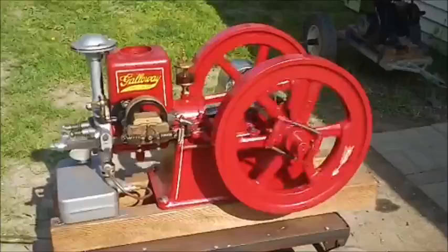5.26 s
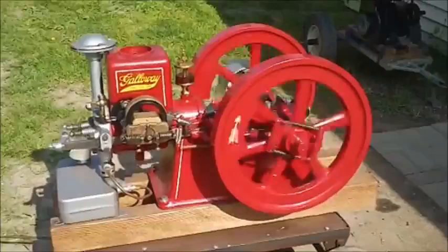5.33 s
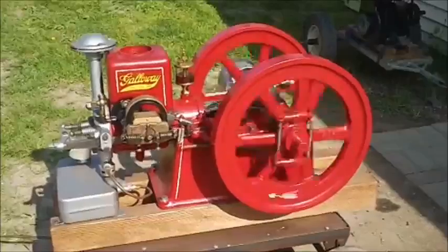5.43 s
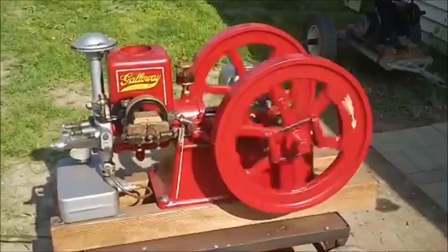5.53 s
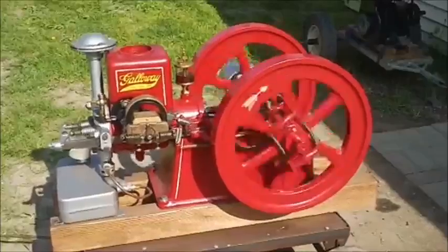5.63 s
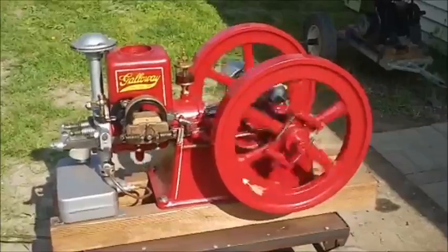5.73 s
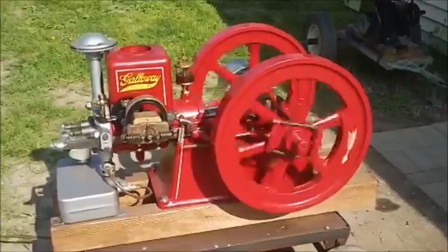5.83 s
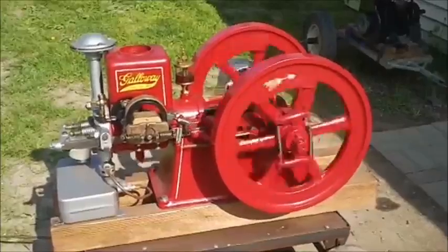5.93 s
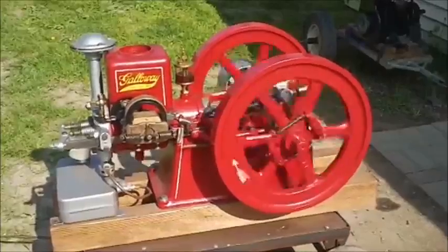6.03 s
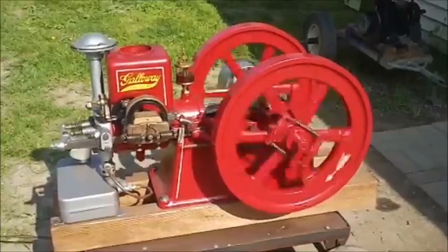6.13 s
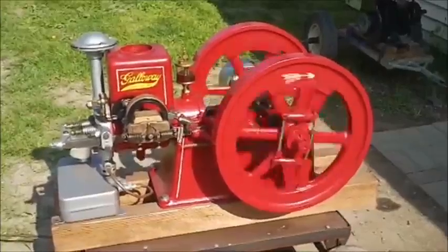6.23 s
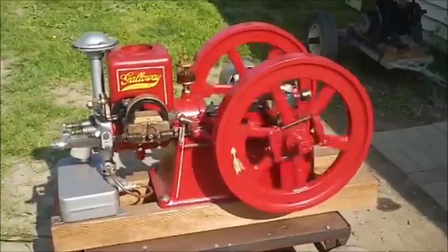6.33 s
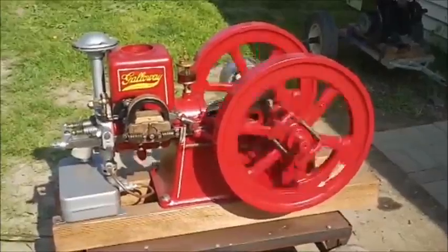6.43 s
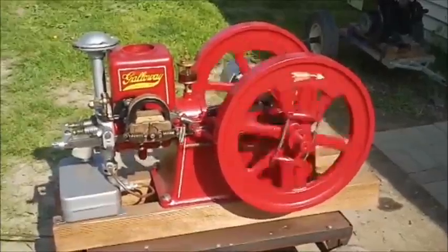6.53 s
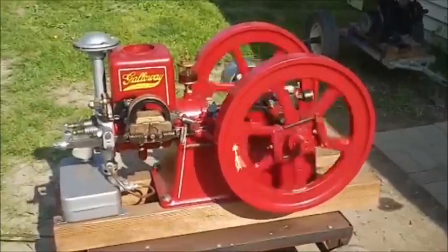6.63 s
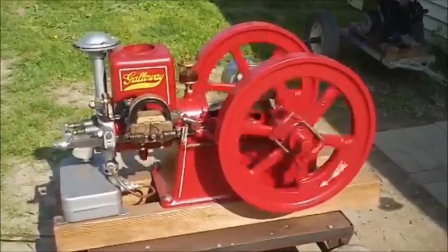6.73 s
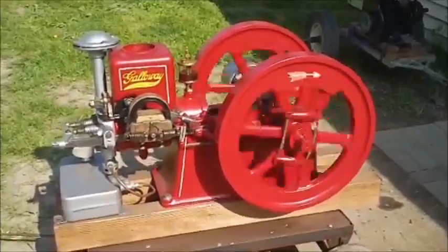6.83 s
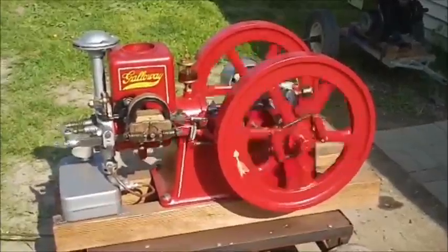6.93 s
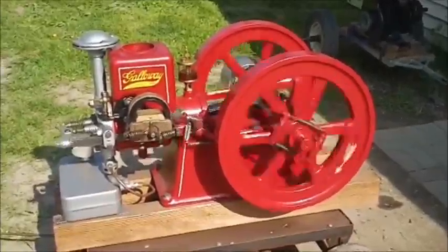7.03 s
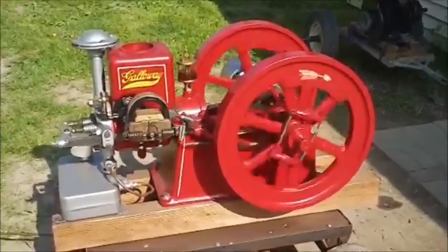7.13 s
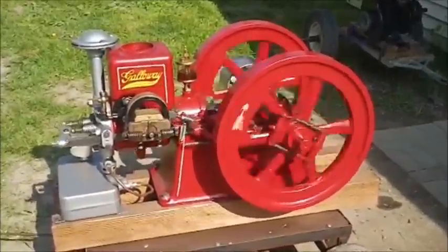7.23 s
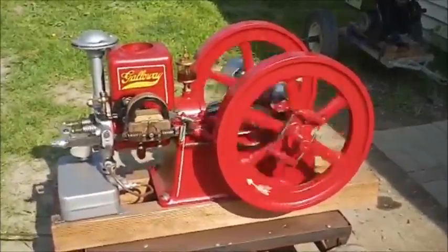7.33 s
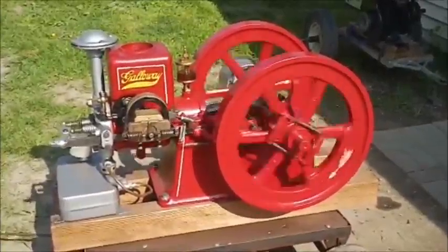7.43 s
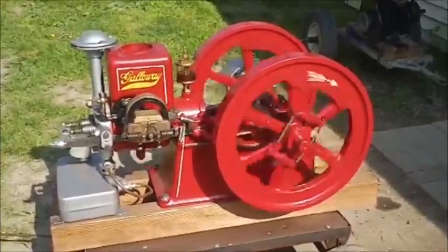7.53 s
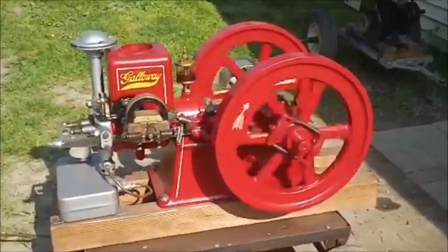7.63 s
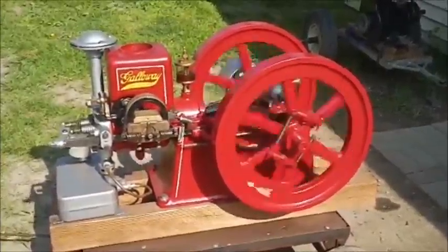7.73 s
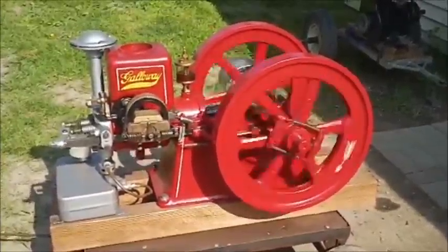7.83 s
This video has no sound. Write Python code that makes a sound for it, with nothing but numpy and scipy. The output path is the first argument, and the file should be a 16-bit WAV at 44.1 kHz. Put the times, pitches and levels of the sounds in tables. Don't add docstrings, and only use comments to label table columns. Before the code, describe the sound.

From 0 s, an old single-cylinder engine coasts close by in an open yard. About every 0.3 s a hard rod clack is answered by a rocker knock, ringing cast iron over continuous gear rattle, tiny steel ticks, low skid hum and a soft hollow air puff. Near 1.9 s the regular clack drops out; suction hisses and hoots, the igniter snaps at 2.1 s, and a second suction leads to a sharp, low-bodied exhaust bang at 2.44 s. Everything else dips at once, and from 2.6 to 3.36 s there is total silence. Clatter cuts back in from a second position, drier and slightly quicker at first, near four turns a second, slowing gradually. A fainter suction begins around 6.95 s; another bang hits at 7.16 s. Clacking continues much quieter, slowly recovering to the end near 8 s. Short outdoor reflections, small microphone with mild clipping.

```python
import sys
import numpy as np
from scipy import signal
from scipy.fft import rfft, irfft, next_fast_len
from scipy.io import wavfile
from scipy.ndimage import map_coordinates

SR = 44100
rng = np.random.default_rng(int(sys.argv[2]) if len(sys.argv) > 2 else 0)


def invert_db(x):
    u = np.asarray(x, float) / 20
    return 10 ** u


def store_wav(level_fs):
    pcm = np.round(np.clip(np.atleast_2d(level_fs), -1, 1) * 32767)
    wavfile.write(sys.argv[1], SR, pcm.T.astype(np.int16))


N = 347067
SCATTER_DB = 2


def unit(x):
    return x / np.sqrt(np.mean(x ** 2) + 1e-20)


def along(points, hz):
    f, v = np.transpose(points)
    return np.interp(np.log(hz + 1), np.log(f + 1), v)


def wobble(rate):
    return map_coordinates(rng.standard_normal(int(N * rate / SR) + 4), [np.arange(N) * rate / SR])


def lumps(grain_db, rate):
    return unit(invert_db(grain_db * wobble(rate)))


def chatter(grain_db, rate):
    return rng.standard_normal(N) * lumps(grain_db, rate)


def filtered(x, response):
    m = next_fast_len(N + SR // 2)
    f = np.fft.rfftfreq(m, 1 / SR)
    gain = np.interp(f, f[::16], response(f[::16]))
    return irfft(rfft(x, m) * gain / np.sqrt(np.mean(np.abs(gain) ** 2)), m)[:N]


def modes(table):
    def response(f):
        return sum((-1) ** k * invert_db(db) * 1j * f * width / (hz * hz - f * f + 1j * f * width)
                   for k, (hz, width, db) in enumerate(table))
    return response


def colour(points):
    return lambda f: invert_db(along(points, f))


def between(response, low_hz, high_hz):
    def limited(f):
        low_edge = (1j * f / (low_hz + 1j * f)) ** 2
        high_edge = modes([(high_hz, high_hz, 0)])(f) / (1j * f + 1e-9)
        return response(f) * low_edge * high_edge
    return limited


def bursts(times, peak_db, t60, rise, alike=0):
    out, habit = np.zeros(N + SR), rng.standard_normal(SR // 2)
    fresh = rng.standard_normal(N + SR)
    for s, db, decay in zip(times, peak_db, np.clip(t60, .005, .45)):
        t, at = np.arange(round(decay * SR)) / SR, round(s * SR)
        shape = invert_db(db - 60 * t / decay) * (1 - np.exp(-(t / rise) ** 2))
        noise = alike * habit[:len(t)] + np.sqrt(1 - alike ** 2) * fresh[at:][:len(t)]
        out[at:][:len(t)] += shape * noise
    return out[:N]


# resonance in Hz, width in Hz, level in dB.
FRAME_NEAR = [(409, 53, 0.5), (683, 38, 0.5), (823.5, 37, 2), (995, 90, -6.5), (1217, 170, -6.5),
              (1504, 89, 5), (1582, 76, 3), (1760, 110, -8.5), (1960, 150, -13), (2304, 140, -6),
              (2680, 140, -10), (2970, 56, -9)]
FRAME_FAR = [(630, 87, -3), (720, 28, 3.5), (817, 40, -3.5), (904, 49, 1), (1033, 69, -5), (1113, 45, -6),
             (1276, 69, -5.5), (1392, 89, -3), (1440, 120, -1.5), (1574, 320, -7.5), (1983, 100, -9),
             (2067, 81.7, -14.5), (2360, 180, -11), (2605, 200, -13.5), (2827, 87, -18.5),
             (3210, 32, -22.5)]
# resonance in Hz, width in Hz, level in dB.
BASE_NEAR = [(112, 80, -22), (180, 91, -12.5), (248.7, 14, 7), (418, 47, -10)]
BASE_FAR = [(118, 89, -0.5), (182, 72, -19), (261, 130, 16.5), (394, 70, -2)]
# frequency in Hz, level in dB per Hz.
STEEL = [(1760, -23), (3000, -7.5), (4720, -6), (5960, -1), (7850, -14), (8640, -8.5), (9850, -2),
         (10900, -12.5), (15500, -19.5)]
# frequency in Hz, level in dB per Hz.
GEARS = [(250, -30), (450, -6.5), (700, 1), (950, -3), (1500, -8.5), (1900, -18.5), (2150, -23.5),
         (2550, -17.5), (2950, -24.5), (4000, -35.5)]


def engine(hits, run, frame, base):
    s, db, tick_db, thump_db, t60 = np.transpose(hits)
    rattle, hiss, drum = run

    iron = bursts(s - .004, db - 1, .8 * t60, rise=0.0019, alike=0.34)
    iron = iron + bursts(s + .005, db - 2, t60, rise=0.0026, alike=0.24)
    for late, hard_db in ((-.001, 18.2), (.0025, 17.2)):
        at = np.round((s + late + .0012 * rng.random(len(s))) * SR).astype(int)
        iron[at] += invert_db(db + hard_db + 2 * rng.standard_normal(len(s)))
    tooth_knocks = rng.random(N) < 55 / SR
    iron = iron + rattle * tooth_knocks * invert_db(19 + 4 * rng.standard_normal(N))

    steel = bursts(s - .0045, db + tick_db + 5, 1.117 * t60, rise=0.0041, alike=0.56)
    steel = steel * lumps(grain_db=3.0, rate=450)
    loose = .8 * hiss * chatter(grain_db=3, rate=400) * lumps(grain_db=3, rate=70)
    small_parts = steel + loose
    wood = bursts(s, db + thump_db + 0.5, 2.21 * t60, rise=0.0047)
    wood = wood + 1.45 * drum * chatter(grain_db=1, rate=60)
    gears = 0.78 * rattle * chatter(grain_db=2.5, rate=91) * lumps(grain_db=2.2, rate=30)

    out = filtered(iron, between(modes(frame), low_hz=200, high_hz=2800))
    out = out + filtered(small_parts, colour(STEEL)) + 0.14 * filtered(small_parts, modes(SPRINGS))
    out = out + pings(s, db + tick_db, hiss)
    out = out + filtered(wood, between(modes(base), low_hz=63, high_hz=612))
    return out + filtered(gears, colour(GEARS))


# push rod clack in seconds, clack in dB,
# rocker in dB, puff of air in dB, place of the puff in turns.
TURNS_NEAR = [
    (.0054, -5, -16, -16.5, .77),
    (0.3007, -7, -12, -13, 0.78),
    (0.5919, -3.5, -11.5, -14, 0.77),
    (0.8903, -5, -13.5, -9.5, 0.77),
    (1.1909, -6, -10, -12.5, 0.76),
    (1.499, -5.5, -12, -14.5, .7),
    (1.8084, -4.5, -12.5, -17.5, 0.62),
    (2.126, -39, -12, -24, 0.75),
    (2.444, -40, -40, -40, .7),
]
TURNS_FAR = [(3.254, -4.5, -10.5, -12, .74), (3.5128, -4.5, -9, -14, .73), (3.7729, -5.5, -11, -11.5, .73),
             (4.0358, -4.5, -10.5, -13, .73), (4.3033, -4.5, -9.5, -14, .74), (4.5737, -4, -10, -13, .74),
             (4.8475, -5, -9.5, -13, .755), (5.1236, -4.5, -13.5, -13.5, .73),
             (5.4063, -5.5, -11.5, -13, .73), (5.6894, -6, -10, -12, .7), (5.9793, -4.5, -10.5, -16, .7),
             (6.2709, -6, -9.5, -14, .7), (6.5688, -5, -10.5, -14.5, .73), (6.8705, -5.5, -10, -23.5, .745),
             (7.1618, -39.5, -13.5, -16.5, .73), (7.4371, -4, -7.5, -13, .745),
             (7.7036, -5, -7.5, -30.5, .73), (7.968, -40, -40, -40, .73)]
# place in turns, level in dB (clack and rocker re their turn),
# steel tick in dB re frame, base thump in dB re frame, chatter t60 in seconds.
CAM_NEAR = [
    (0, 0, -16, -11.5, .063),
    (.245, -1.5, -12.5, -2.5, 0.078),
    (.6, -25, -30, -5.5, .09),
    (.7, -23, -20, -1.5, 0.091),
    (.81, -26, -21, -1, .05),
]
CAM_FAR = [
    (0, 0, -12, -17, 0.039),
    (.245, .4, -15, -14, .047),
    (.59, -24, -26, -12.5, .045),
    (.76, -24, -19.5, -8.5, 0.048),
]
# level in dB, steel tick in dB, thump in dB, t60 in seconds.
TRIP = (-16, -8.5, -9, 0.2)
# start in seconds, level in dB, thump in dB.
FLUTTER = [
    (1.9655, -16.5, -2.5),
    (2.2594, -18.5, 3),
    (2.3178, -13.5, -12),
    (6.9745, -14.5, -1),
    (7.049, -17, -16),
]


def contacts(turns, cam):
    rows = []
    for (s, clack_db, rocker_db, *_), (end, *_) in zip(turns, turns[1:]):
        luck = rng.standard_normal((len(cam), 4))
        for k, (place, db, tick_db, thump_db, t60) in enumerate(cam):
            faint = k > 1
            place = place + faint * .012 * luck[k, 0]
            level_db = db + (SCATTER_DB * luck[k, 1] if faint else (clack_db, rocker_db)[k])
            tick_db, thump_db = tick_db + 0.87 * luck[k, 2], thump_db + 0.87 * luck[k, 3]
            rows.append((s + (end - s) * place, level_db, tick_db, thump_db, t60))
    rows += [(trip, *TRIP) for _, trip, *_ in STROKES]
    rows += [(s, db, -13, thump_db, 0.06) for s, db, thump_db in FLUTTER]
    return [row for row in rows if turns[0][0] <= row[0] < min(turns[-1][0], N / SR - .01)]


# place in turns, load in dB.
LOAD_NEAR = [(.1, 2.5), (.3, 3.5), (.55, -3), (.75, -0.5), (.92, -2.5)]
LOAD_FAR = [(.12, 2.5), (.3, 3), (.55, -4), (.75, -1.5), (.92, -2)]
# level in dB, growth with load in dB per dB,
# drift in dB per second as the wheels slow.
RUN_NEAR = [(-25.5, 1.1, 0.5), (-45.5, 1.5, 0), (-28, .8, -2)]
RUN_FAR = [(-29, 1, -.5), (-51.5, .5, -.5), (-37, 0.72, -1)]


def running(turns, load, run):
    t, s = np.arange(N) / SR, np.transpose(turns)[0]
    turn = np.interp(t, s, np.arange(len(s)))
    load_db = np.interp(turn, *np.transpose(load), period=1)
    coasting = np.clip(t - s[0], 0, s[-1] - s[0]) * (t < BANGS[1][0])
    return [invert_db(db + grows * load_db + sag * coasting) for db, grows, sag in run]


# resonance in Hz, width in Hz, level in dB.
SPRINGS = [(5800, 180, -6.5), (6400, 140, -4.5), (8750, 180, 0), (9750, 340, 4.5), (13500, 580, -0.5)]


def ticks(times, peak_db):
    out, t = np.zeros(N + SR), np.arange(SR // 25) / SR
    luck, part = rng.standard_normal((len(times), 2)), rng.integers(len(SPRINGS), size=len(times))
    part_hz, _, part_db = np.transpose(SPRINGS)
    hz = part_hz[part] * (1 + .035 * luck[:, 0])
    level_db = peak_db + part_db[part] / 2 + 3 * luck[:, 1]
    rings = invert_db(level_db[:, None] - 60 * t / .016) * np.sin(2 * np.pi * hz[:, None] * t)
    at = np.round(times * SR).astype(int)
    np.add.at(out, at[:, None] + np.arange(len(t)), rings * (1 - np.exp(-t / .0005)))
    return out[:N]


def pings(s, tick_db, hiss):
    idle = rng.random(round(70 * N / SR)) * N / SR
    late = .01 * rng.random((len(s), 3))
    after_blows = ticks((s[:, None] + late).ravel(), np.repeat(tick_db - 6, repeats=3))
    return hiss * ticks(idle, np.full(len(idle), 5)) + after_blows


# place in turns, level in dB.
BOARD_STRIKES = [
    (.03, -18),
    (.31, -22),
    (.78, -22),
]


def hum(drum):
    t, s = np.arange(N) / SR, np.transpose(TURNS_NEAR)[0]
    shut, swing = t > STROKES[0][0], 0.45 * drum
    for start, end in zip(s, s[1:]):
        for (place, db), luck in zip(BOARD_STRIKES, rng.standard_normal(len(BOARD_STRIKES))):
            since = np.clip(t - start - place * (end - start), 0, 1)
            decay = invert_db(db + SCATTER_DB * luck - 60 * since / .24)
            swing = swing + decay * (1 - np.exp(-since / .006))
    pitch_hz = 246 + 30 * shut + (3.5 + 10 * shut) * wobble(16)
    note = np.sin(2 * np.pi * np.cumsum(pitch_hz) / SR)
    return swing * invert_db(-1.5 * shut) * lumps(grain_db=1.0, rate=14) * note


# start in seconds, crack in dB, push in dB re crack, crack t60 in seconds,
# blow-down in dB re crack, blow-down t60 in seconds.
BANGS = [
    (2.4363, 1.5, 5, .045, -19, 0.29),
    (7.1619, 0.5, 2.5, 0.056, -20.5, 0.26),
]
# frequency in Hz, level in dB per Hz.
BLAST = [(18, -50), (30, -16), (219, 0.5), (561, -10), (1260, -6.5), (2020, -10.5), (3400, -10.5),
         (3980, -15.5), (7860, -10), (12300, -10.5), (15500, -16)]


def firings():
    s, db, push_db, t60, down_db, down_t60 = np.transpose(BANGS)
    jet = bursts(s, db, t60, rise=0.00033) + bursts(s, db + down_db, down_t60, rise=0.0045)
    out = filtered(jet, colour(BLAST))
    push_hz, push_t60, rise_s = 215, .017, .001
    t = np.arange(SR // 12) / SR
    for at, level in zip(s, db + push_db):
        push = invert_db(level - 60 * t / push_t60) * np.sin(2 * np.pi * push_hz * t + 0.79)
        out[round((at - .0015) * SR):][:len(t)] += push * (1 - np.exp(-t / rise_s))
    return out


# resonance in Hz, puff length in seconds, place of the return puff in turns,
# level of the return puff in dB.
PORT_NEAR = (910, 0.04, 0.4, -15)
PORT_FAR = (790, .027, .5, -29.5)


def puffs(turns, port):
    hz, length, back, back_db = port
    rows = []
    for (s, _, _, db, place), (end, *_) in zip(turns, turns[1:]):
        luck = rng.standard_normal(3)
        rows.append((s + place * (end - s), db, hz * (1 + .05 * luck[0]), length))
        rows.append((s + back * (end - s), back_db + SCATTER_DB * luck[1], hz * (1 + .05 * luck[2]), length))
    return rows


# pitch ratio, width in Hz, delay in puff lengths, level in dB.
PORT = [(0.84, 130, -0.4, -11), (0.95, 160.7, -0.05, -9.5), (1.15, 190, 0.3, -14.5),
        (1.887, 347, 0.46, -18), (3., 404, 0.93, -29.5), (7.502, 3005, -0.008, -34.5)]
# time in seconds, level in dB, port resonance in Hz.
GULPS = [
    (1.939, -17, 1020),
    (2.109, -10.5, 844),
    (2.17, -14, 800),
    (2.225, -13.5, 897),
    (2.299, -15.5, 1060),
    (2.438, -13.5, 1230),
    (3.374, -21.5, 736),
    (7.025, -18, 920),
    (7.143, -10.5, 720),
]


def breathing():
    out, t = np.zeros(N + SR), np.arange(-3072, 5120) / SR
    f = np.fft.rfftfreq(len(t), 1 / SR)
    gulps = [(*gulp, .022) for gulp in GULPS]
    for s, db, hz, length in puffs(TURNS_NEAR, PORT_NEAR) + puffs(TURNS_FAR, PORT_FAR) + gulps:
        for pitch, width, late, stage_db in PORT:
            port = modes([(pitch * hz, 1.5 * width, 0)])(f) ** 2
            swell = np.exp(-((t / length - late) / 0.63) ** 2)
            air = swell * irfft(rfft(rng.standard_normal(len(t))) * port, len(t))
            air = air * np.linalg.norm(swell) / np.linalg.norm(air)
            out[round((s + t[0]) * SR):][:len(t)] += invert_db(db + stage_db) * air
    return out[:N]


# start in seconds, igniter trip in seconds, suction hiss in dB,
# release hiss in dB, pipe tones in dB.
STROKES = [
    (1.885, 2.0762, -24.5, -17, 1),
    (2.203, 2.401, -23, -20, -1.5),
    (6.944, 7.1273, -27.5, -28, -9),
]
# frequency in Hz, level in dB per Hz.
AIR = [(1760, -42), (3000, -4.5), (4890, -2), (7850, -10), (9390, -2.5), (10800, -8), (12700, -7),
       (15500, -9.5)]


def intake():
    t, out = np.arange(N) / SR, np.zeros(N)
    hissing = filtered(chatter(grain_db=2.2, rate=150), colour(AIR))
    throb = filtered(rng.standard_normal(N), modes([(85, 97, 0)]))
    tone = filtered(rng.standard_normal(N), modes([(283, 23, 0)]))
    high_tone = filtered(rng.standard_normal(N), modes([(435, 16, 0)]))
    rise_s, full_share, fall_db_s, release_t60 = .04, 0.58, 351, .25
    exhaust_late_s, exhaust_s, throb_late_s = .03, .028, 0.025
    for s, trip, suck_db, release_db, pipe_db in STROKES:
        falling = np.clip(t - s - full_share * (trip - s), 0, 1)
        suck = np.clip((t - s) / rise_s, 0, 1) * invert_db(-fall_db_s * falling)
        release = (t > trip) * invert_db(-60 * np.clip(t - trip, 0, 1) / release_t60)
        exhaust = np.exp(-((t - trip - exhaust_late_s) / exhaust_s) ** 2)
        pipe = invert_db(-34) * (suck + np.roll(exhaust, round(throb_late_s * SR))) * throb
        pipe = pipe + invert_db(-20.5) * suck * tone + invert_db(-17) * exhaust * high_tone
        hiss = 0.6 * (invert_db(suck_db) * suck + invert_db(release_db) * release) * hissing
        out += hiss + invert_db(pipe_db) * pipe
    return out


# frequency in Hz, t60 in seconds.
YARD = [(100, 0.21), (1500, 0.36), (6000, 0.21), (14000, 0.065)]


def yard(x):
    out, step = np.zeros(N + SR), SR // 3
    for i in range(0, N, step):
        hz, t, z = signal.stft(rng.standard_normal(SR // 3), SR, nperseg=256)
        decay = invert_db(-60 * t / along(YARD, hz)[:, None])
        tail = signal.istft(z * decay, SR, nperseg=256)[1]
        wet = signal.fftconvolve(x[i:i + step], tail / np.linalg.norm(tail))
        out[i + 300:][:len(wet)] += wet
    return out[:N]


def neighbourhood():
    return invert_db(-51.5) * filtered(rng.standard_normal(N), modes([(140, 100, 0)]))


# start in seconds, end in seconds.
BREAK = (2.599, 3.3635)


def scene():
    t = np.arange(N) / SR
    first, second = np.clip(t - BANGS[0][0], 0, 1), np.clip(t - BANGS[1][0], 0, 1)
    dive_db_s, dive_db, recover_db_s = 230.5, 18.5, 10
    second_dive = np.minimum(dive_db_s * second, dive_db - recover_db_s * second)
    duck = invert_db(np.where(t < BREAK[0], -dive_db_s * first, -second_dive))

    run_near = running(TURNS_NEAR, LOAD_NEAR, RUN_NEAR)
    run_far = running(TURNS_FAR, LOAD_FAR, RUN_FAR)
    near = engine(contacts(TURNS_NEAR, CAM_NEAR), run_near, FRAME_NEAR, BASE_NEAR) + hum(run_near[2])
    far = engine(contacts(TURNS_FAR, CAM_FAR), run_far, FRAME_FAR, BASE_FAR)
    machine = near * (t < BREAK[0]) + far * (t > BREAK[0])
    dry = (machine + breathing() + intake()) * duck + neighbourhood()
    audible = (t < BREAK[0]) | (t > BREAK[1])
    return ((dry + invert_db(-13) * yard(dry) + firings()) * audible)[None]


def top_cut(x):
    return signal.sosfilt(signal.butter(12, 16240, fs=SR, output="sos"), x)


# centre in Hz, width in Hz, depth in dB.
NOTCHES = [(7790, 500, -15), (10780, 290, -11)]


def record(dry):
    def microphone(f):
        dips = invert_db(sum(db / (1 + ((f - hz) / width * 2) ** 4) for hz, width, db in NOTCHES))
        return dips * np.clip((15600 - f) / 400, 0, 1) ** 2 * f ** 2 / (f ** 2 + 60. ** 2)
    x = 0.75 * filtered(dry[0], microphone)
    x = x / (1 + np.abs(x / 0.81) ** 6) ** (1 / 6)
    return top_cut(x[None])


dry = scene()
out = record(dry)
store_wav(out)
```